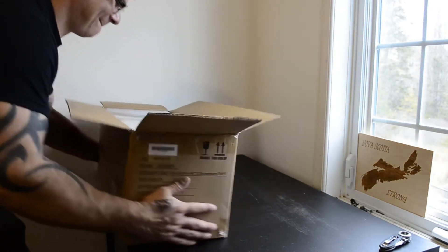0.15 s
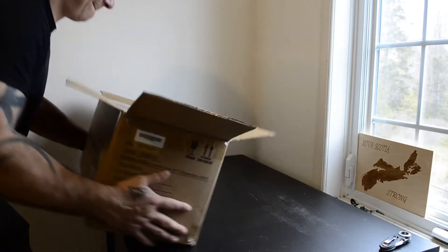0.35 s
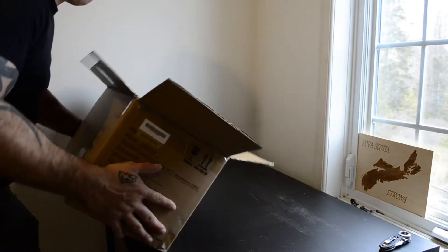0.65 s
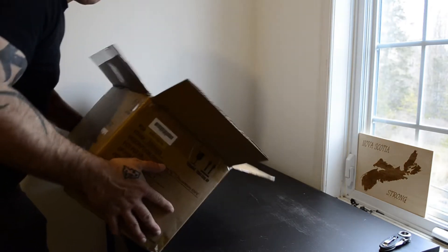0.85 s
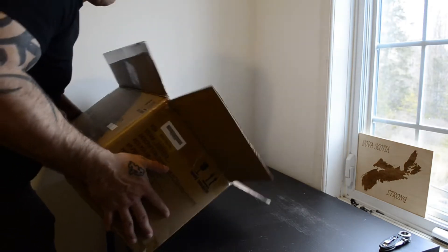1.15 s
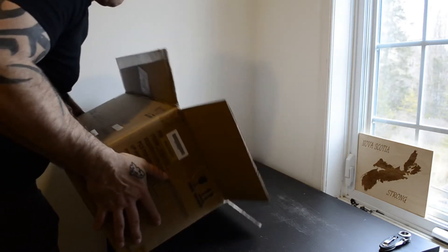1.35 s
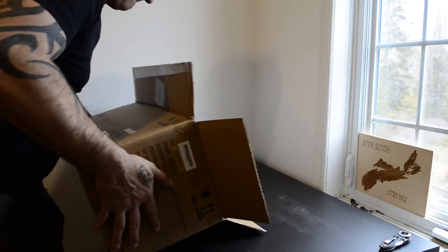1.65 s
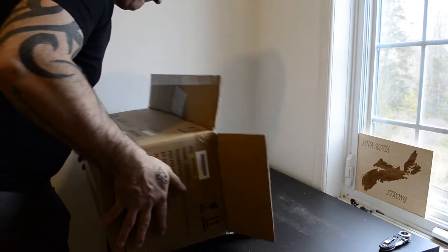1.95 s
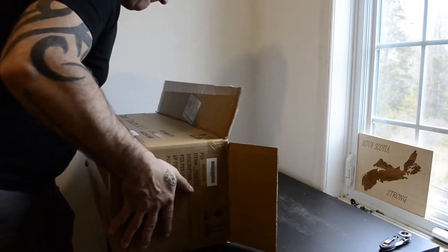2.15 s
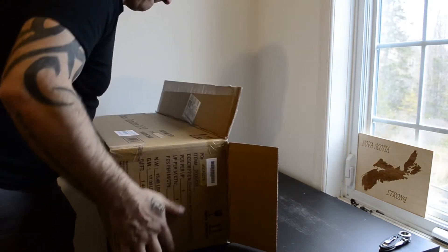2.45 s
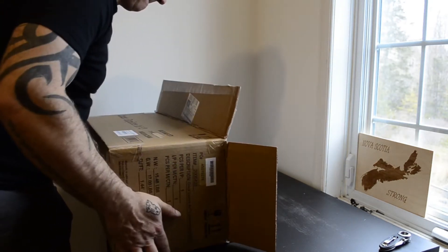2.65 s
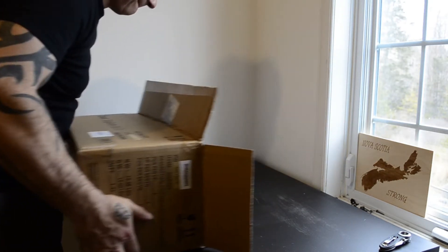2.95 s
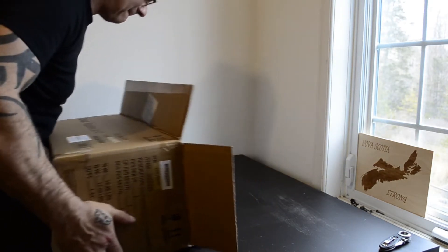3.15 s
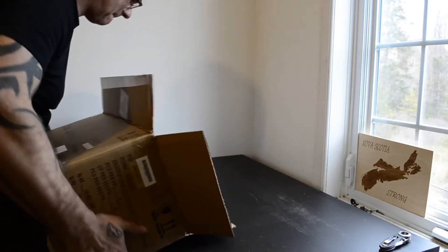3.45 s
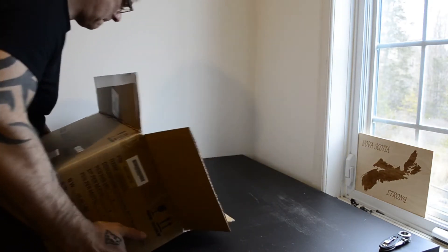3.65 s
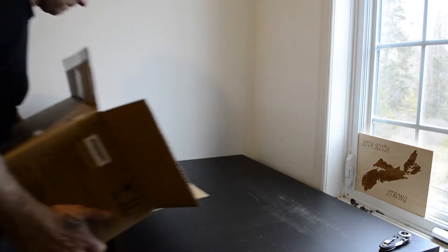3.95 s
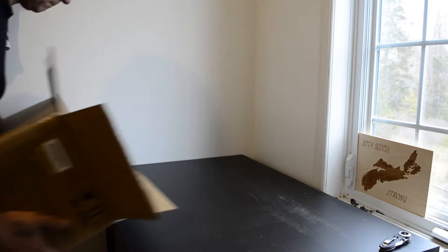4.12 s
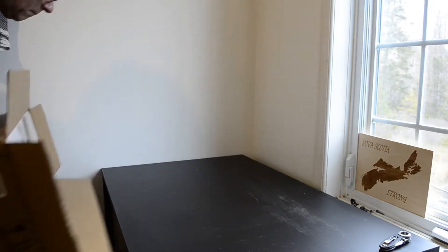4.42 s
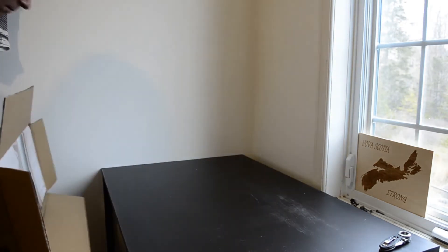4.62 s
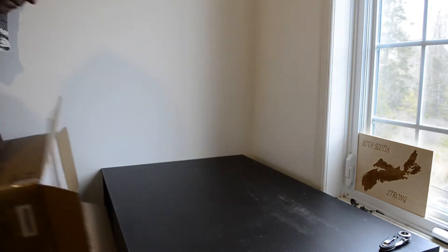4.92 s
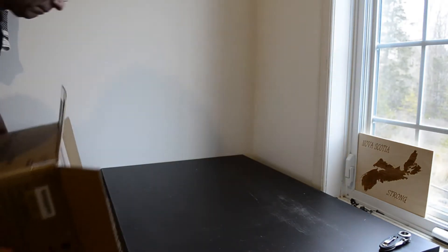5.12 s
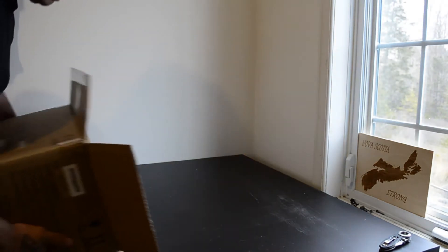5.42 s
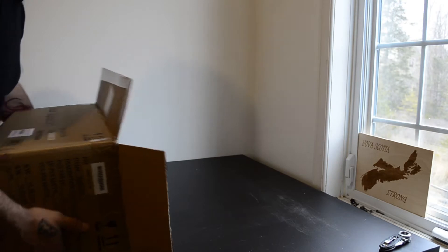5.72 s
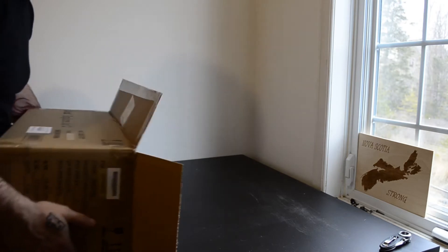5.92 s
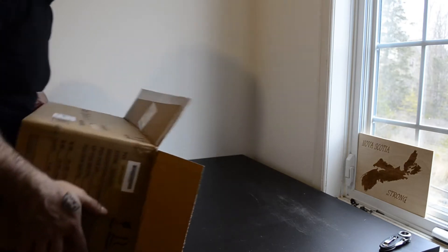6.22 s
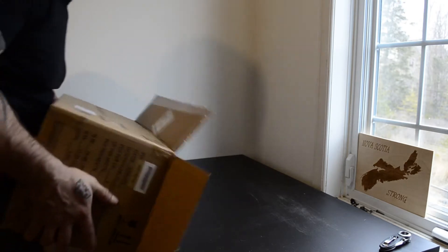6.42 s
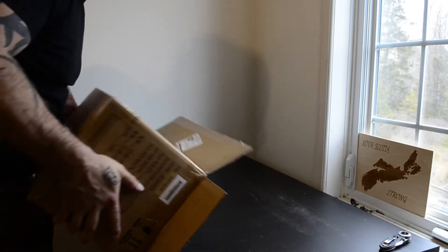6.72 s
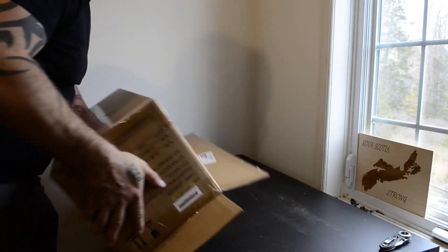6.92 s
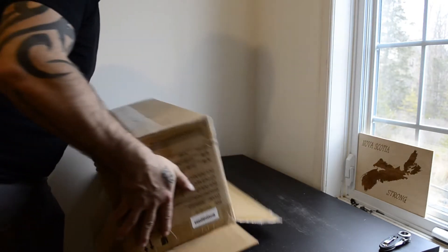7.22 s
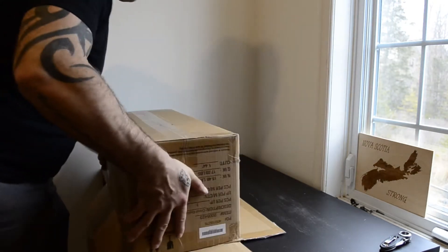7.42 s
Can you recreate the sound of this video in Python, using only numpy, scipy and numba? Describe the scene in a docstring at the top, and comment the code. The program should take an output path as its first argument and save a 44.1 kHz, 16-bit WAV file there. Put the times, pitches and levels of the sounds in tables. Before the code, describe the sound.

In a small bare room, an open cardboard box is tipped on a hollow desk with boomy rubbing and thumps. Papery scraping follows, then a quieter stretch, a cluster of hollow knocks around five seconds, and a loud squeaky knock past six. A deep thump and crisp tap finish it. Close microphone, soft room hush.

```python
"""A cardboard box is tipped, dragged, turned and set down on a hollow desk in a small bare room.
Rubbing: random fibre slips drum the walls, boom the panels, scrape the edges and hiss on the paper faces.
Corners knock (noise bursts through box resonances); edges squeak (wavering sines).
Desk: falling-pitch thumps, a long hum of the top and band-passed leg rumble.
Behind: coloured-noise hush and amplifier hiss."""
import sys
import numpy as np
from scipy import signal
from scipy.fft import rfft, irfft
from scipy.io import wavfile
from scipy.ndimage import uniform_filter1d
from numba import njit

SR = 44100
rng = np.random.default_rng(int(sys.argv[2]) if len(sys.argv) > 2 else 0)


def unload_audio(sound):
    """Save the sound as a 16-bit wav file, at the path given as the first command line argument."""
    columns = np.transpose(np.atleast_2d(sound))
    # keep every value between -1 and 1, then stretch to whole-number steps
    steps = np.round(np.clip(columns, -1, 1) * 32767)
    wavfile.write(sys.argv[1], SR, steps.astype(np.int16))


N = 333837

# background hush spectrum, relative: f/Hz, density/dB
HUSH_SPECTRUM = [(24, -34), (40, -2), (81, 3), (130, -4), (231, 2.5), (382, 0), (467, -4.5), (663, -0.5),
                 (1090, -0.5), (6490, -21), (11000, -27.5), (14800, -29.5), (16000, -23)]
# amplifier hiss spectrum, relative: f/Hz, density/dB
AMP_HISS_SPECTRUM = [(18, -37), (30, 5), (844, -4), (3310, -24.5), (5040, -35), (7270, -36), (10800, -19),
                     (16000, -10.5)]
# weight landing on desk or floor: t/s, level before onset shaping/dB, settled f/Hz, ring to -60 dB/s
THUMPS = [(0.912, -26, 70.0, 0.1), (1.178, -32, 61.4, 0.15), (1.345, -20, 205, 0.28),
          (2.004, -42, 186, 0.15), (2.128, -36, 189, 0.15), (2.274, -34, 79, 0.12), (2.92, -37, 58.8, 0.13),
          (3.468, -54, 129, 0.18), (3.925, -36, 51.1, 0.15), (4.158, -34, 184, 0.2),
          (4.318, -43, 205, 0.18), (4.782, -51, 79, 0.15), (4.998, -20, 152, 0.3),
          (5.396, -36, 183.4, 0.17), (5.768, -36, 189, 0.17), (6.384, -18.5, 200.6, 0.096),
          (7.28, -17.5, 76.6, 0.11)]
# load shifting on the desk: t/s, rise/s, hold/s, hum fade to -60 dB/s, hum level/dB, rumble level/dB
DESK_LOADS = [(-.05, .05, .08, .5, -53, -62), (.08, .2, 0.11, 3, -46.5, -60), (.3, .04, .002, 3, -54, -52),
              (0.498, .17, 0.003, 0.8, -44, -52), (0.918, 0.056, 0.022, .3, -48, -34.5),
              (1.057, 0.036, .002, -0.1, -44, -54), (1.17, .03, .04, 0.9, -47, -49),
              (1.35, 0.064, .002, 0.3, -46, -43), (1.5, 0.13, 0.31, -0.3, -58, -70),
              (2.002, 0.036, .002, .25, -48.5, -58), (2.088, .04, 0.0028, 1.5, -49, -45),
              (2.27, .1, .01, .5, -43.5, -46), (2.5, 0.19, 0.19, .5, -59.5, -68),
              (2.88, .06, .002, 2, -56, -57), (3.05, .05, .12, .2, -62, -72),
              (3.55, .12, 0.14, .4, -63, -66), (3.91, .04, .002, 0.7, -53, -50),
              (3.998, 0.063, .03, 0, -58, -68), (4.16, .03, .22, 0.6, -56.5, -70),
              (4.775, .03, .03, 0.7, -52, -78), (4.958, .06, 0.025, .5, -42.5, -45),
              (5.302, 0.14, .08, 0, -61, -70), (5.77, 0.03, 0.0018, .5, -46, -41),
              (5.798, 0.11, 0.14, 0.4, -49, -60), (6.37, .03, .05, 1.2, -42.5, -50),
              (6.5, .15, .24, .25, -52.5, -66), (7.195, .02, 0.0023, 2, -45, -58),
              (7.28, .03, .002, 0.55, -30.5, -36.5), (7.45, .08, .1, .5, -48, -63)]
# edge catching and singing: t/s, f/Hz, level before flutter and envelope/dB, fade to 1/e/s
SQUEAKS = [(6.265, 657, -22, 0.041), (6.27, 1314, -25, 0.054), (6.303, 3590, -27, 0.024),
           (6.311, 4770, -31.5, 0.032), (6.358, 2256, -24.5, 0.027), (6.36, 4780, -27, 0.015),
           (6.382, 1844, -14.5, 0.009), (6.383, 4470, -28, 0.016), (7.202, 746, -41, 0.035),
           (7.492, 1350, -36.5, 0.038), (7.495, 1580, -40, .03)]
# corners and flaps striking: t/s, ring peak/dB, favoured f/Hz, crack re ring peak/dB, build-up/s,
# rattle to 1/e^3/s
KNOCKS = [(0.798, -36, 229.2, -26, 0.0015, 0.016), (0.916, -29, 418, -31, 0.001, 0.02),
          (0.949, -36, 657, -27, 0.0013, 0.026), (1.085, -39, 342, -24, 0.0018, 0.02),
          (1.337, -23, 785, -22, 0.0013, 0.023), (1.888, -45, 676, -14, 0.0015, 0.023),
          (1.993, -47, 760, -19, 0.002, 0.028), (2.28, -33, 500, -18, .0015, 0.019),
          (2.37, -40, 900, -14, .0015, 0.013), (3.479, -41, 476, -19, 0.0018, 0.014),
          (3.55, -34, 824, -13, 0.0015, 0.018), (3.942, -39.5, 517, -19, 0.0015, 0.02),
          (4.139, -50, 232, -11, 0.0013, 0.023), (4.964, -25.5, 245, -15, 0.0016, 0.03),
          (5.001, -17.5, 400, -28, 0.0013, 0.012), (5.067, -14.5, 735, -32, 0.0018, 0.023),
          (5.081, -16, 367, -40, 0.0011, 0.035), (5.391, -30.5, 790, -25, 0.0016, 0.04),
          (6.249, -20, 393, -23, 0.0011, 0.0066), (6.379, -6, 694, -27, 0.0034, 0.018),
          (7.203, -33, 830, -13, 0.0013, 0.02), (7.271, -24.5, 340, -24, 0.0014, 0.016),
          (7.308, -20.5, 310, -22, 0.0032, 0.02), (7.4905, -23, 1390, -22, 0.00046, 0.011)]
# strokes of box on box, desk or hand: t/s, rise/s, hold/s, fade to -60 dB/s, wall drumming level/dB,
# then re drumming: panel boom/dB, edge scrape/dB, coarse paper hiss/dB, fine paper hiss/dB;
# fullest wall tone f/Hz
RUBS = [(-.1, .1, .06, 0.82, -39.5, -5, 2.5, -10.5, -9, 497),
        (.04, 0.084, 0.21, 0.81, -34.5, -5.5, -0.5, -15, -13, 406),
        (.22, .12, 0.026, .6, -26.5, -10, -15, -25, -27.5, 402),
        (.38, 0.039, 0.04, 0.32, -35.5, -0.5, -5.5, -17.5, -15.5, 366),
        (.48, .17, 0.034, 0.3, -39, -4, -5, -11.5, -17, 407),
        (0.795, 0.014, .01, 0.13, -40.5, -4, -6, -15.5, -23, 431),
        (0.915, 0.0018, 0.0086, 0.28, -35, -15, -10, -28, -36, 450),
        (.945, 0.01, 0.013, 0.23, -40, -3, -6.5, -19, -23, 490),
        (1.075, .015, .01, .3, -44, -11, -1.5, -19, -22, 480),
        (1.12, .05, .03, .4, -45, -2, -6, -19, -20.5, 446),
        (1.27, .02, .02, .2, -52, -6, -7, -18, -25, 450),
        (1.336, 0.0024, 0.05, 0.31, -24.5, -7.5, -13, -21, -20, 520),
        (1.45, .05, .22, .3, -52.5, -0.5, -3, -15, -14, 500),
        (1.77, 0.057, .02, 0.47, -47, -11, -12, -28, -20, 430),
        (1.89, 0.00086, .002, .15, -52.5, -2, 6, 6.5, 3.5, 630),
        (1.9, 0.085, .005, 0.44, -47.5, -9, -1.5, -11, -9, 510),
        (1.994, .001, 0.0043, 0.21, -35.5, -4.5, -6.5, -21, -27, 544),
        (2.101, 0.03, .01, .3, -48, -2, -2.5, -9, -9, 460),
        (2.14, 0.076, 0.072, .35, -47, -9, -1, -3, -2, 520),
        (2.31, 0.053, 0.025, 0.19, -51, -6, 4.5, -1, -2.5, 550),
        (2.43, 0.15, 0.089, 0.72, -51.5, -7, 2.5, -4, -6.5, 483),
        (2.553, 0.045, 0.054, .4, -44, -16, 4, -0.5, -3.5, 590),
        (2.6, .14, 0.086, 0.75, -33.5, -12, 1.5, -6.5, -5, 477),
        (2.8, 0.084, .1, 0.33, -37.5, -5.5, 2, -2.5, -5, 460),
        (3.04, 0.15, 0.39, 0.53, -52, -16, 1.5, -3.5, -0.5, 620),
        (3.28, .05, .08, 0.33, -54, -16, 2, -1, -0.5, 570),
        (3.46, 0.025, .002, 0.25, -39.5, -8, -8.5, -20, -16, 470),
        (3.55, .001, .01, 0.29, -44, -10, 1, -6, -7.5, 610),
        (3.6, 0.022, 0.077, 0.34, -56.5, -3, 0, -2, -6, 610),
        (3.88, 0.056, 0.067, 0.33, -62.5, 0, -1, 3.5, 1, 510),
        (3.94, .001, .002, 0.17, -43.5, -12, -11, -18, -20, 435),
        (3.98, 0.023, .002, 0.12, -52, -3, -11, -8, -13, 390),
        (4.139, .001, 0.022, 0.2, -54, 8, 5.5, 7, -4, 350), (4.22, 0.034, .03, .3, -65.5, 2, 0, 9, 4, 594),
        (4.31, .002, .002, .2, -57, 6, -10, -7, -15, 390),
        (4.5, 0.088, .1, .3, -57.5, -13, -9, -5.5, -4.5, 450),
        (4.77, 0.032, 0.0017, 0.28, -51, -1.5, -12, -32, -39, 400),
        (4.961, 0.00092, 0.015, 0.24, -31, -0.5, -9.5, -26, -23.5, 387),
        (5.003, .001, 0.037, 0.34, -23.5, -6.5, -10.5, -22, -27.5, 405),
        (5.04, 0.034, 0.022, .35, -22, -7.5, -10.5, -28.5, -30, 460),
        (5.25, .02, 0.1, 0.27, -40.5, -17, -8, -15, -17.5, 445),
        (5.392, 0.0012, 0.0071, 0.54, -39, -4.5, -2, -16, -19, 660),
        (5.46, 0.065, 0.041, 0.42, -49, -7, 2, -7, -9, 540),
        (5.55, 0.045, .15, 0.42, -44.5, -10.5, 7.5, -7, -9, 640),
        (5.769, 0.0016, 0.046, 0.34, -36.5, -7.5, -4, -14.5, -24, 524),
        (5.9, .03, .04, 0.27, -54, -3, -5, -14, -22, 500),
        (6.021, .002, .01, 0.42, -39, -5.5, -10, -16, -18, 443),
        (6.04, 0.041, 0.02, .5, -37.5, -5, -4.5, -11.5, -16, 626),
        (6.18, 0.055, 0.028, .1, -45.5, -6, -4, -14, -16, 570),
        (6.248, 0.0012, .01, 0.43, -24, -6.5, 0, -11, -17.5, 526),
        (6.27, 0.051, 0.063, .12, -28, -16, 6, -3.5, -7.5, 620),
        (6.369, 0.0063, 0.031, 0.29, -21.5, -10, 1, -7.5, -12.5, 680),
        (6.52, 0.14, .002, 0.93, -39, -9.5, -4, -13, -14.5, 543),
        (6.68, 0.038, 0.16, 0.47, -51, -7, -4, -2.5, -4.5, 615),
        (6.9, 0.057, 0.0026, 0.87, -41.5, -11, -4, -11.5, -15.5, 497),
        (7.0, 0.055, 0.063, 1, -49.5, -8, -1.5, -4.5, -7, 460),
        (7.202, 0.0012, 0.054, .1, -39, -2.5, -2.5, -9.5, -6.5, 700),
        (7.264, 0.015, 0.0058, 0.17, -32, 4.5, 5.5, -3, -11, 453),
        (7.29, 0.021, 0.016, 0.38, -29.5, -8, -9, -16, -25, 370),
        (7.49, .001, 0.0023, 0.36, -40, -14, 0.5, -2.5, -9, 560),
        (7.4, .06, 0.036, .1, -50.5, -8, -3, -6, -9, 500)]
# large-panel resonances: f/Hz, width/Hz, level/dB
PANEL_MODES = [(116, 23.6, -5), (141, 35, -3), (192, 65, -4), (234.4, 29.3, 0.5), (260.6, 28.3, -0.5)]
# wall resonances: f/Hz, width/Hz, level/dB
WALL_MODES = [(312.8, 34.5, 2.5), (370, 26.4, 3.5), (414.4, 29.5, 2.5), (516, 133, -3.5), (578, 25.3, 1.5),
              (643.5, 75, -1.5), (762, 89, 1.5), (899, 70, -1)]
# edge resonances: f/Hz, width/Hz, level/dB
EDGE_MODES = [(991, 206, -1.5), (1364, 200, -1), (1502, 173, -0.5), (1860, 395, -4), (2207, 256, -2),
              (2470, 355, -5.5), (2950, 370, -5.5), (3540, 430, -12), (4440, 220, -20.5), (5020, 20, -23)]
# paper hiss spectrum, relative: f/Hz, density/dB
PAPER_SPECTRUM = [(1470, -21), (2500, -1.5), (3060, -3.5), (3800, -2.5), (4170, -4), (6250, -8),
                  (7710, -9.5), (12700, -29), (14500, -32), (16000, -37)]
# edge tone favoured by the contact as the box turns: t/s, f/Hz
EDGE_TONE = [(0, 1550), (.2, 1900), (.45, 1520), (.65, 1700), (1.0, 1210), (1.8, 1200), (2.25, 1800),
             (2.5, 1450), (2.65, 1820), (3.4, 1730), (3.9, 1300), (4.15, 1900), (4.5, 1250), (5.2, 1210),
             (5.7, 1380), (6.1, 1660), (6.3, 1450), (6.36, 1790), (6.6, 1450), (6.8, 1710), (7.5, 1400)]

HUSH_DB, AMP_HISS_DB = -52.5, -73.5  # RMS; the hush then drifts
ROOM_T60_S, ROOM_TREBLE_T60_S, ROOM_DB = 0.33, 0.39, -8
HUM_HZ, HUM_SAG_HZ, RUMBLE_FADE_S = 78, 60, 0.59  # sag per unit of rumble amplitude
BOOM_HZ = 215
TOP_HZ = 15750


def undb(db):
    """dB to amplitude ratio."""
    return 10 ** (np.asarray(db) / 20)


def level(x, db):
    """Scale x to an RMS level in dB."""
    return x * undb(db) / np.sqrt(np.mean(x ** 2))


@njit
def svf(x, hz, q):
    """State-variable band-pass, moving centre and sharpness, unity gain at centre."""
    y, band_state, low_state = np.empty(len(x)), 0., 0.
    for i in range(len(x)):
        g = np.tan(np.pi * hz[i] / SR)
        v = (band_state + g * (x[i] - low_state)) / (1 + g * (g + 1 / q[i]))
        band_state = 2 * v - band_state
        low_state = low_state + 2 * g * v
        y[i] = v / q[i]
    return y


def band(x, hz, q):
    """Fixed band-pass."""
    return svf(x, np.full(len(x), 1. * hz), np.full(len(x), 1. * q))


def body(x, modes):
    """Sum of resonances with alternating sign."""
    out = np.zeros(len(x))
    for k, (hz, width_hz, db) in enumerate(modes):
        out += (-1) ** k * undb(db) * band(x, hz, hz / width_hz)
    return out


def colour(x, points):
    """Filter x by (Hz, dB) points, interpolated over log frequency."""
    hz, db = np.transpose(points)
    f_hz = np.arange(len(x) // 2 + 1) * SR / len(x) + 1
    gain = undb(np.interp(np.log(f_hz), np.log(hz), db))
    return irfft(rfft(x) * gain, len(x))


def walk(rate_hz):
    """Random levels held 1 / rate_hz and slewed; spread near 0.5."""
    k = int(SR / rate_hz)
    held = np.repeat(rng.standard_normal(N // k + 1), k)
    return 0.65 * uniform_filter1d(uniform_filter1d(held, k), k)[:N]


def swells(rows, gains):
    """Power of each gain column: every row rises smoothly, holds, fades; rows add."""
    out, t = np.full((gains.shape[1], N), 1e-12), np.arange(N) / SR
    for (s, rise, hold, fade), gain in zip(rows, gains):
        now = slice(max(int(s * SR), 0), int((s + rise + hold + fade) * SR))
        up = np.sin(np.pi / 2 * np.clip((t[now] - s) / max(rise, 1e-4), 0, 1)) ** 1.05
        fading_s = np.maximum(t[now] - s - rise - hold, 0)
        shape = up * np.exp(-np.log(1000) * fading_s / max(fade, .02))
        out[:, now] += (gain[:, None] * shape) ** 2
    return out


def hush():
    """Background: coloured noise whose level drifts slowly."""
    noise = colour(rng.standard_normal(N), HUSH_SPECTRUM)
    return level(noise, HUSH_DB) * undb(1.3 * walk(3))


def amplifier_hiss():
    """Faint steady coloured noise."""
    return level(colour(rng.standard_normal(N), AMP_HISS_SPECTRUM), AMP_HISS_DB)


def room(x):
    """Bare walls: adds a dense decaying noise echo whose treble lasts a little longer."""
    t = np.arange(SR // 2) / SR
    noise = rng.standard_normal(len(t))
    bass = signal.lfilter(*signal.butter(1, 2500, fs=SR), noise)
    treble = noise - bass
    echo = bass * undb(-60 * t / ROOM_T60_S) + treble * undb(-60 * t / ROOM_TREBLE_T60_S)
    echo = echo * np.clip(t / 0.014, 0, 1)  # gradual build-up
    echo = echo / np.sqrt(np.sum(echo ** 2))
    return x + undb(ROOM_DB) * signal.fftconvolve(x, echo)[:N]


def thumps():
    """Landing weight: soft decaying sines, pitch falling as the panel relaxes."""
    out, t = np.zeros(N + SR), np.arange(SR // 2) / SR
    for s, db, hz, ring_s in THUMPS:
        fade = np.exp(-np.log(1000) * t / max(ring_s, .02))
        onset = 1 - np.exp(-t / 0.0096)
        sag = 1 + 0.2 * np.exp(-t / 0.018)
        tone = np.sin(2 * np.pi * np.cumsum(hz * sag) / SR)
        i = int(s * SR)
        out[i:i + len(t)] += undb(db) * fade * onset * tone
    return out[:N]


def desk_hum_and_rumble():
    """Shifting load hums the top's lowest mode, flattened by rumble, and rumbles the legs."""
    rows = np.array(DESK_LOADS)
    hum_gain = np.sqrt(swells(rows[:, :4], undb(rows[:, 4:5]))[0])
    # the legs answer sooner and do not hold
    jolts = [(s, rise / 2, 0, RUMBLE_FADE_S) for s, rise in rows[:, :2]]
    rumble_gain = np.sqrt(swells(jolts, undb(rows[:, 5:]))[0])
    hz = HUM_HZ - HUM_SAG_HZ * rumble_gain + 0.84 * walk(8)
    tone = np.sqrt(2) * np.sin(2 * np.pi * np.cumsum(hz) / SR)
    hum = tone * hum_gain * undb(1.3 * walk(12))
    rumble = band(band(rng.standard_normal(N), 52, 1.5), 52, 1.5)
    return hum + level(rumble, -1.1) * rumble_gain


def squeaks():
    """Edge catching: short rough sines, wavering pitch, quick start, slower fade."""
    out = np.zeros(N + SR)
    wobble_n, flutter_n = SR // 300, SR // 250
    for s, hz, db, length_s in SQUEAKS:
        t = np.arange(int(2 * length_s * SR)) / SR
        waver = uniform_filter1d(rng.standard_normal(SR // 5), wobble_n)[:len(t)] * np.sqrt(wobble_n)
        rough = uniform_filter1d(rng.standard_normal(SR // 5), flutter_n)[:len(t)] * np.sqrt(flutter_n)
        shape = undb(4 * rough) * np.minimum(t / 0.0032, 1) * np.exp(-(t / length_s) ** 2)
        tone = np.sin(2 * np.pi * np.cumsum(hz * (1 + 0.035 * waver)) / SR)
        i = int(s * SR)
        out[i:i + len(t)] += undb(db) * shape * tone
    return out[:N]


def knocks():
    """A crack, then a short rattle ringing the panels, walls and edges nearest its pitch."""
    out, t = np.zeros(N + SR), np.arange(SR // 5) / SR
    for s, db, hz, crack_db, rise_s, rattle_s in KNOCKS:
        noise = rng.standard_normal(len(t))
        rise = np.minimum(t / max(rise_s, 1e-4), 1)
        decay = np.exp(-np.maximum(t - rise_s, 0) / max(rattle_s / 3, .001))
        push = noise * rise * decay
        push[0] += 6.5  # the blow itself
        ring = body(push, PANEL_MODES + WALL_MODES + EDGE_MODES)
        ring = band(band(ring, hz, 1.37), hz, 1.37)
        crack = band(noise * np.exp(-t / .0012), 3600, 1.0)
        hit = ring / np.abs(ring).max() + undb(crack_db) * crack / np.abs(crack).max()
        i = int(s * SR)
        out[i:i + len(t)] += undb(db) * hit
    return out[:N]


def slips(per_s, spread_db, patchy_db, patch_rate_hz):
    """Fibres letting go: random clicks, a few large, louder and softer in patches."""
    when, size, sign = rng.random(N), rng.exponential(1, N), rng.standard_normal(N)
    gain = undb(spread_db * size + patchy_db * walk(patch_rate_hz))
    return (when < per_s / SR) * sign * gain


def rubbing():
    """Stick-slip drives panels, walls, edges and paper faces."""
    rows = np.array(RUBS)
    wall = undb(rows[:, 4:5])
    gains = np.hstack([wall, wall * undb(rows[:, 5:9]), wall * np.sqrt(rows[:, 9:])])
    power = swells(rows[:, :4], gains)
    drum_gain, boom_gain, edge_gain, coarse_gain, fine_gain = np.sqrt(power[:5])
    wall_hz = np.clip(power[5] / power[0], 100, 1500)  # power-weighted: strongest stroke dominates
    edge_hz = np.clip(np.interp(np.arange(N) / SR, *np.transpose(EDGE_TONE)), 600, 5000)
    judder = undb(.5 * walk(45))  # grip comes and goes for all parts together

    boom = body(slips(3000, 0.62, 0.97, 42), PANEL_MODES)
    boom = level(band(boom, BOOM_HZ, 1.33), -1.84)

    # hold and contact points favour one stretch of wall and edge
    drum = body(slips(5000, 0.37, 0.23, 70), WALL_MODES)
    drum = level(drum, -4.5) + level(svf(drum, wall_hz, np.full(N, 2.5)), -4.0)
    drum = level(band(drum, 550, 0.53), -1.46)  # heavy walls pass little treble

    scrape = body(slips(9000, 1.37, 0.26, 90), EDGE_MODES)
    scrape = level(scrape, -15.0) + level(svf(scrape, edge_hz, np.full(N, 1.3)), -1.5)
    scrape = level(scrape, -2.43)

    hiss = colour(slips(14000, 1.0, 0.36, 110), PAPER_SPECTRUM)
    coarse = signal.sosfilt(signal.butter(3, 5800, "low", fs=SR, output="sos"), hiss)
    fine = signal.sosfilt(signal.butter(3, 5800, "high", fs=SR, output="sos"), hiss)
    paper = level(coarse, -0.09) * coarse_gain + level(fine, -1.04) * fine_gain

    return (drum * drum_gain + boom * boom_gain + scrape * edge_gain + paper) * judder


def scene():
    """One microphone feeds both channels; amplifier hiss enters them in opposite polarity."""
    box = room(rubbing() + knocks() + squeaks())
    mid = box + thumps() + desk_hum_and_rumble() + hush()
    side = amplifier_hiss()
    return np.array([mid + side, mid - side])


def record(dry):
    """Steep elliptic low-pass at TOP_HZ."""
    return signal.sosfilt(signal.ellip(10, .2, 70, TOP_HZ, fs=SR, output="sos"), dry)


dry = scene()
out = record(dry)
unload_audio(out)
```